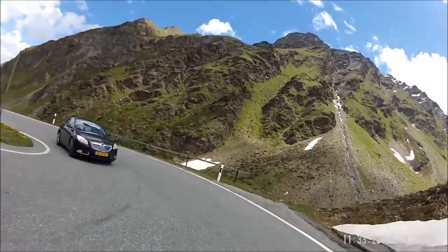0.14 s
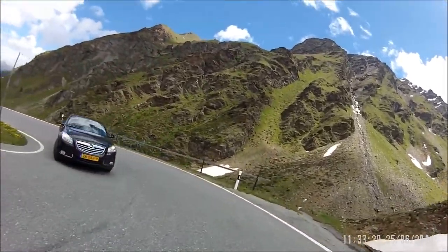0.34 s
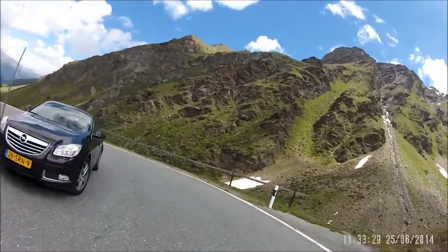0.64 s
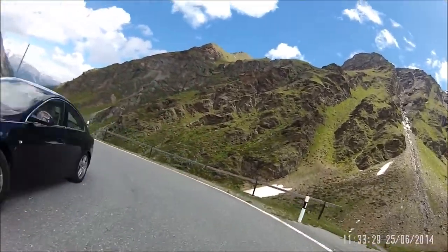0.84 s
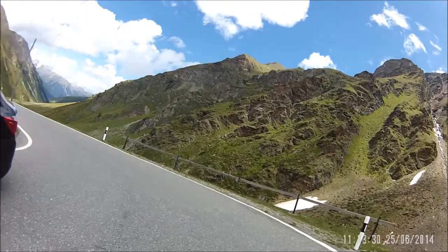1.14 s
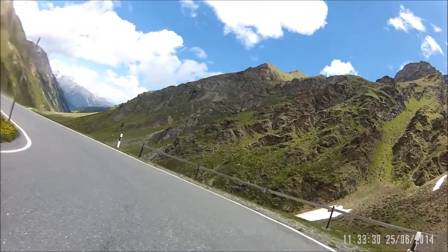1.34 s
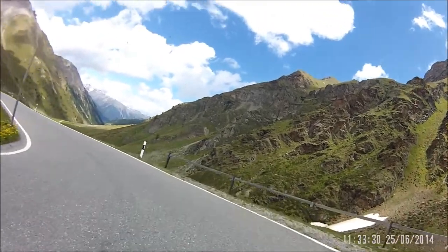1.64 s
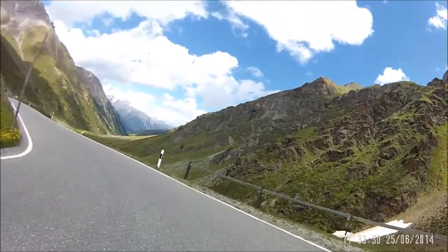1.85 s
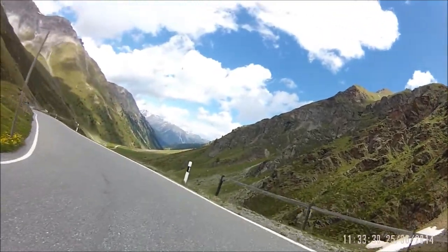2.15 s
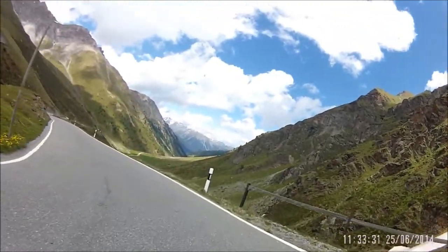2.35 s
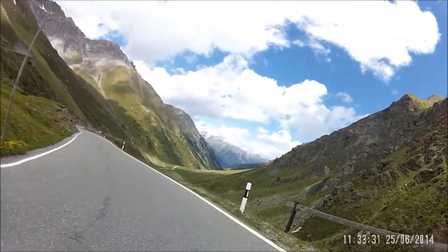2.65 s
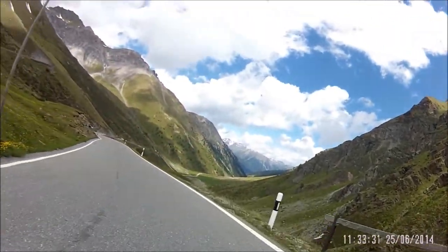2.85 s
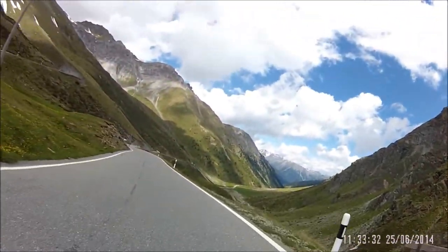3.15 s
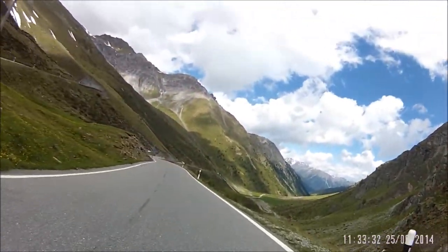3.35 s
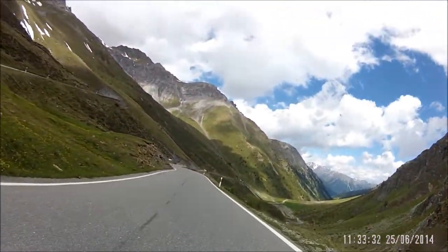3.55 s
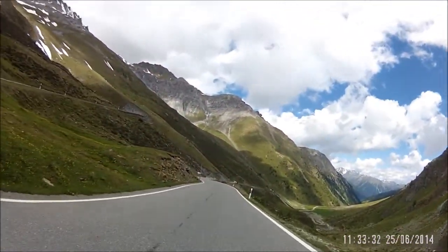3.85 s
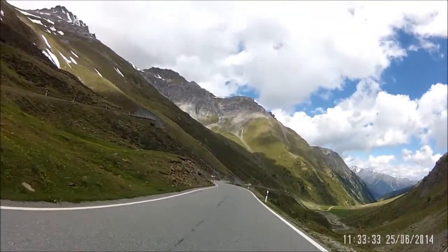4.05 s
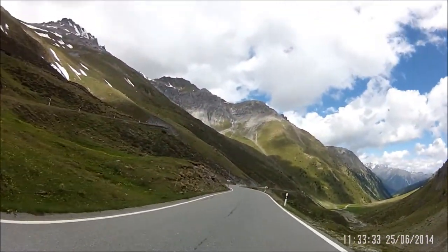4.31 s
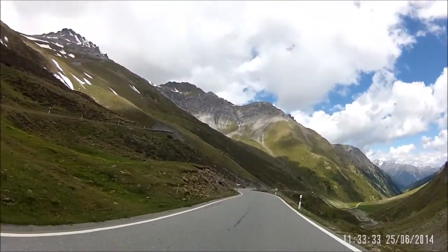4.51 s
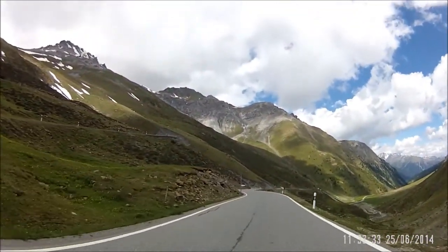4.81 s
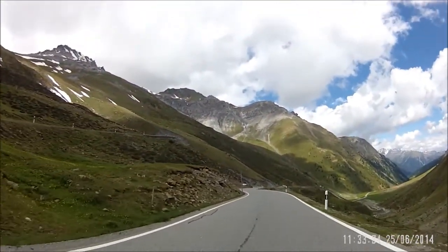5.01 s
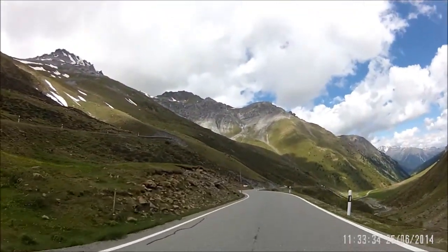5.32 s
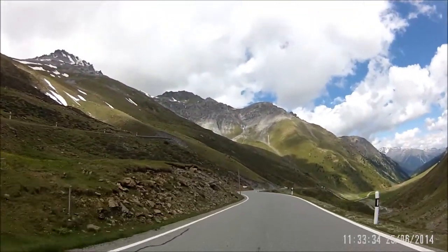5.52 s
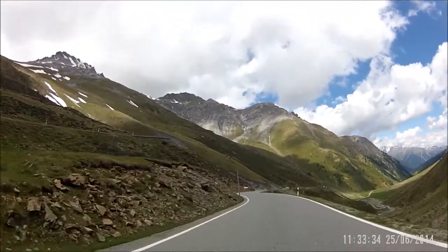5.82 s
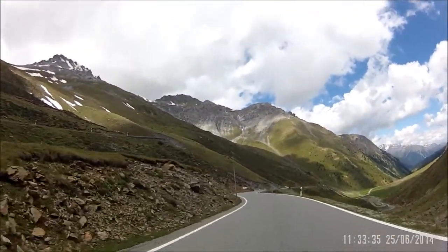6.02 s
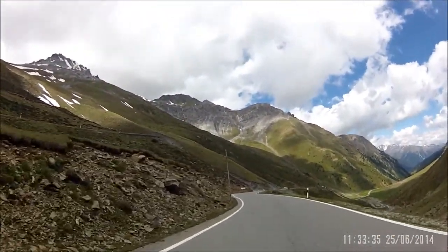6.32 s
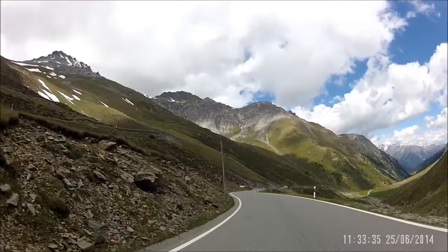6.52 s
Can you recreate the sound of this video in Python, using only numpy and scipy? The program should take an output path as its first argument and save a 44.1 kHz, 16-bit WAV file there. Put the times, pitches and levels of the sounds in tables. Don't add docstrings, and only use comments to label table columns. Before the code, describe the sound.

A twin-cylinder motorcycle idles lumpily round a hairpin as a car hisses past, then the throttle opens and it climbs into a loud drone.

```python
import sys
import numpy as np
from scipy import signal
from scipy.fft import rfft, irfft, next_fast_len
from scipy.io import wavfile
from scipy.ndimage import uniform_filter1d, map_coordinates

SR = 44100
rng = np.random.default_rng(int(sys.argv[2]) if len(sys.argv) > 2 else 0)


def volts(x):
    e = np.asarray(x, float) / 20
    return 10 ** e


def materialize(psi):
    bounded = np.clip(np.atleast_2d(psi).T, -1, 1)
    quanta = np.round(bounded * 32767).astype(np.int16)
    wavfile.write(sys.argv[1], SR, quanta)


N = 294130
TIME = np.arange(N) / SR

# start_s, speed_cycles_per_s
ENGINE_SPEED = [(0, 11.72), (.479, 12.36), (1.036, 12.13), (1.473, 11.41), (1.743, 11.86), (2.094, 11.4),
                (2.751, 11.33), (3.4, 11.92), (3.712, 16.7), (4.191, 16.89), (4.371, 18.78), (4.659, 18.22),
                (4.75, 19.18), (5.44, 23.2), (5.9, 25.84), (6.43, 28.85), (6.67, 30.2)]
# start_s, load_0_to_1
ENGINE_LOAD = [(3.28, 0.13), (3.68, 0.39), (4.16, 0.55), (4.5, 0.79), (5.6, 0.88), (6.67, 1)]

# pitch_hz, width_hz, level_db
FRONT_PIPE = [(45, 166, -7.5), (123.5, 52, 2), (168.5, 15.7, 9.5), (242, 140, -16)]
REAR_PIPE = [(76, 12, 2), (101, 48.3, 1), (145.8, 25.2, 4.5), (209, 74, -15)]
# order_per_cycle, level_db (under the pops)
FRAME_SHAKE = [(3, -13), (5, -13), (8, -8.5), (12, -14), (14, -9.5)]
# pitch_hz, level_db
SILENCER_RUMBLE = [(32, -40.5), (55, -15), (64, -23.5), (73, -10.5), (86, 0), (151, -5), (215, -10.5),
                   (320, -20.5), (420, -52), (700, -120)]

# place_in_cycle, level_db
VALVE_TAPS = [(0.048, -8.5), (.36, -7), (0.478, 1.5), (.74, -7.5), (0.86, 4.5)]
# pitch_hz, level_db
CASE_IDLE = [(530, -23), (900, -19), (999, -34.5), (1120, -11), (1220, -16.5), (1370, -7.5), (1450, -10),
             (1500, -3.5), (1810, -9), (2060, -7), (2190, -6), (2400, -4.5), (3170, -17.5), (3600, -22.5),
             (4680, -58), (7920, -120)]
CASE_PULLING = [(530, -33), (900, -16), (1030, -8.5), (1110, -0.5), (1210, -6.5), (1410, 0), (1560, -3.5),
                (1710, -1.5), (1860, -5), (2100, -1), (3080, -7), (3320, -29.5), (3600, -15.5),
                (4680, -45.5), (7920, -120)]
# pitch_hz, level_db
TYRE_HISS = [(1880, -34), (3200, -1), (3480, -7), (4030, -6), (5080, -11), (6280, -27.5), (8160, -58.5),
             (13800, -120)]
GAS_ROAR = [(150, -29.5), (260, -1.5), (301, -8), (375, -3.5), (415, -10.5), (497, -6), (633, -10),
            (1000, -10.5), (1300, -44), (2200, -120)]
# pitch_hz, level_db
RAP_COLOUR = [(600, -45), (1200, 6.5), (3000, 0.0), (4800, -16.5), (6000, -47.5), (8000, -92)]

# pitch_hz, level_db
WIND_COLOUR = [(8.2, -30.5), (14, -9.5), (38, -8.5), (47, -8.5), (55, -11.5), (72, -40.5), (120, -120)]
# centre_s, extra_db, half_length_s
GUSTS = [
    (0.527, -2, .15),
    (1.96, -3, 0.21),
    (4.413, -2, .2),
    (6.122, 3, 0.21),
]
# pitch_hz, level_db
CAR_TYRES = [(500, -17), (1200, -9), (2200, 1), (3500, -4), (5000, -19.5), (6300, -26), (9000, -80)]

# start_s, peak_db, pitch_hz
JOLTS = [(3.315, -37, 525), (3.39, -37, 372), (3.489, -35, 328), (3.995, -32.5, 567), (4.085, -32, 576),
         (4.1, -39, 360), (4.81, -35.5, 1080), (4.865, -34, 490), (5.29, -38, 556), (5.635, -34, 1150),
         (5.645, -27, 2200), (5.776, -28, 556), (6.306, -24.5, 385), (6.63, -26, 560)]
# order_per_cycle, level_db (at full load)
GEAR_MESH = [(19, -39.5), (20, -43), (32, -40), (33, -42.5)]
# pitch_hz, width_hz, level_db
TANK_PANELS = [(490, 75, 0), (945, 70, 0)]

# start_s, firing_db, gulp_db
THROTTLE = [(3.549, -23, -32), (3.631, -6, -3), (3.7, -0.3, 4), (4.2, 0.5, 7), (4.4, 1, 9), (4.75, 4.5, 4),
            (5.2, 5, 5.5), (5.88, 7, 8), (5.98, 6, 8), (6.2, 6.5, 8), (6.27, 8.7, 11.5), (6.67, 7, 8.5)]
FIRINGS = (.616, .021)
GULPS = (.226, .832)
# pitch_hz, width_hz, level_db
HOT_PIPES = [
    [(76.7, 6, 21.9), (110.8, 15.8, 23.9), (150.4, 30.5, 30.3), (137.5, 40.4, 17.1)],
    [(78.9, 6, 27), (149.1, 6.5, 20.2), (172.1, 56.7, 25.2), (228, 40, 13)],
]
# pitch_hz, width_hz, level_db
AIRBOX = [
    [(83, 25.4, 22.9), (162.3, 9.3, 19.5), (240, 25.6, 2), (101.4, 8.1, 20.7)],
    [(97.1, 9.1, 26.3), (146, 34.8, 30.2), (158.4, 32.3, 28.4), (181.9, 24, 17.5)],
]
PIPE_SIGNS = [(1, 1, -1, 1), (-1, -1, 1, -1)]
AIRBOX_SIGNS = [(-1, 1, -1, 1), (-1, -1, 1, 1)]

# start_s, peak_db, pitch_hz
GRIT = [
    (3.713, -29, 2570),
    (4.0711, -43, 2500),
    (4.573, -45, 2533),
    (4.63, -45, 2500),
    (5.194, -32, 3070),
    (5.946, -40, 2530),
    (6.2874, -46, 2590),
]
# pitch_hz, level_db
PREAMP_HISS = [(5000, -32.5), (6500, -3), (10000, -5), (15200, -10), (16000, -93)]


def unit(x):
    return x / np.sqrt(np.mean(x ** 2) + 1e-20)


def curves(rows):
    s, *columns = np.transpose(rows)
    return [np.interp(TIME, s, column) for column in columns]


def by_load(idle_db, gain_db):
    return idle_db + gain_db * curves(ENGINE_LOAD)[0]


def bell(centre_s, half_s):
    return np.exp(-((TIME - centre_s) / half_s) ** 2)


def wobble(rate):
    return map_coordinates(rng.standard_normal(int(N * rate / SR) + 4), [TIME * rate])


def filtered(x, response):
    m = next_fast_len(N + SR // 2)
    return irfft(rfft(x, m) * response(np.fft.rfftfreq(m, 1 / SR)), m)[:N]


def noise(spectrum):
    f, db = np.transpose(spectrum)
    white = rng.standard_normal(N)
    return unit(filtered(white, lambda hz: volts(np.interp(np.log(hz + 1), np.log(f), db))))


def patchy(x, depth_db):
    z = signal.stft(x, nperseg=512)[2]
    field = uniform_filter1d(rng.standard_normal(z.shape), size=3, axis=0)
    field = uniform_filter1d(field, size=8, axis=1)
    return unit(signal.istft(z * volts(depth_db * unit(field)), nperseg=512)[1][:N])


def ringing(x, modes, signs):
    def response(f):
        total = 0
        for sign, (hz, width, db) in zip(signs, modes):
            damping = 1j * f * width
            total = total + sign * volts(db) * damping / (hz * hz - f * f + damping)
        return total
    return filtered(x, response)


def rounded(x):
    return filtered(x, lambda f: 1 / np.sqrt(1 + (f / 255) ** 10))


def crank():
    return np.cumsum(curves(ENGINE_SPEED)[0]) / SR


def beats(place, jitter, scatter_db):
    turns = crank()
    luck = rng.standard_normal((int(turns[-1]), 2))
    places = np.arange(len(luck)) + place + jitter * luck[:, 0]
    at = np.interp(places, turns, np.arange(N))
    return np.bincount(at.astype(int), volts(scatter_db * luck[:, 1]), N)


def exhaust():
    front = ringing(beats(.974, jitter=.004, scatter_db=2), FRONT_PIPE, [1, -1, -1, 1])
    rear = ringing(beats(.589, jitter=.004, scatter_db=2), REAR_PIPE, [1, -1, 1, -1])
    pops = unit(rounded(volts(-6.5) * front + rear))
    shake = sum(volts(db) * np.cos(2 * np.pi * (order * crank() + .05)) for order, db in FRAME_SHAKE)
    idle = (pops + shake) * np.interp(TIME, [3.55, 3.7], [1, 0])
    return volts(by_load(-31.3, 5) - 2) * (idle + volts(-9) * noise(SILENCER_RUMBLE))


def mechanics():
    taps = sum(volts(db) * beats(place, jitter=0.01, scatter_db=2) for place, db in VALVE_TAPS)
    t = TIME[:SR // 20]
    flare = signal.fftconvolve(taps, np.exp(-t / 0.0056) - np.exp(-t / 0.00037))[:N]
    pulling = np.interp(TIME, [3.5, 3.85], [0, 1])
    case = np.sqrt(1 - pulling) * patchy(noise(CASE_IDLE), depth_db=1.5)
    case = case + np.sqrt(pulling) * patchy(noise(CASE_PULLING), depth_db=1.0)
    clatter = volts(by_load(-42, 11.75) - 1.5) * (0.83 + 0.48 * flare) * case
    hiss = volts(by_load(-56, 15.1) - 0.97) * (0.63 + 0.54 * flare) * noise(TYRE_HISS)
    clutch_db = 2.5 * bell(3.42, 0.23)
    roar_db = by_load(-47, 13.2) + clutch_db - 1.2 + 1.3 * wobble(30)
    roar = volts(roar_db) * (0.81 + 0.48 * flare) * noise(GAS_ROAR)
    return clatter + hiss + roar


def whistle():
    speed = curves(ENGINE_SPEED)[0]
    shut_hz = np.minimum(1548 + 75 * (speed - 11.8), 1620)
    pull_hz = 1390 + 36 * (speed - 18.5)
    hz = np.where(TIME < 3.6, shut_hz, pull_hz)
    level_db = np.interp(TIME, [3.38, 3.6, 4.5, 5.15], [-48, -60, -60, -39.5])
    level_db = level_db + np.interp(TIME, [5.45, 5.7], [0, -6.5])
    warble_hz = 55 * np.sin(2 * np.pi * crank()) + 10 * wobble(12)
    turn = 2 * np.pi * np.cumsum(hz + warble_hz) / SR
    note = (4 + wobble(70)) * np.cos(turn) + wobble(70) * np.sin(turn)
    octave = wobble(120) * np.cos(2 * turn) + wobble(120) * np.sin(2 * turn)
    upper = (1 + wobble(90)) * np.cos(1.56 * turn) + wobble(90) * np.sin(1.7 * turn)
    return volts(level_db) * unit(note + volts(-1.0) * octave + volts(-7.0) * upper)


def knock():
    front = beats(.47, jitter=.004, scatter_db=2)
    rear = beats(.855, jitter=.004, scatter_db=2)
    raps = front + volts(-4) * rear
    t = TIME[:SR // 50]
    burst = signal.fftconvolve(raps, np.exp(-t / .003) - np.exp(-t / .0007))[:N]
    boom = ringing(raps, [(505, 50, 30), (340, 42, 21)], [1, -1])
    labour_db = 5 * bell(4.5, .3)
    level_db = by_load(-42.5, 15.8)
    return volts(level_db) * boom + volts(level_db + labour_db) * burst * noise(RAP_COLOUR)


def wind():
    gusts_db = sum(db * bell(s, half_s) for s, db, half_s in GUSTS)
    return volts(by_load(-44.5, 7.4) + gusts_db + 0.72 * wobble(9.1)) * noise(WIND_COLOUR)


def car():
    nearest_m, speed_m_per_s, hidden_s = 3.2, 6.3, 0.14
    since_s = TIME - 1.17
    nearness = nearest_m / np.hypot(nearest_m, speed_m_per_s * since_s)
    shadow = np.exp(-np.clip(since_s, 0, None) / hidden_s)
    return volts(-45.5) * nearness * shadow * patchy(noise(CAR_TYRES), depth_db=2.0)


def jolts():
    rise_s, t60_s = 0.0035, 0.062
    out, t = np.zeros(N + SR), TIME[:SR // 8]
    for s, db, hz in JOLTS:
        envelope = volts(db + 3 - 60 * t / t60_s) * (1 - np.exp(-t / rise_s))
        out[round(s * SR):][:len(t)] += envelope * np.sin(2 * np.pi * hz * t)
    turns = crank()
    mesh = sum(volts(db + 2 * wobble(24)) * np.cos(2 * np.pi * order * turns) for order, db in GEAR_MESH)
    singing = ringing(curves(ENGINE_LOAD)[0] ** 3 * mesh, TANK_PANELS, [1, -1])
    return out[:N] + ringing(singing, TANK_PANELS, [1, -1])


def pulse_drone(level_db, places, bodies, polarities):
    drone = 0
    for place, modes, signs in zip(places, bodies, polarities):
        pulses = beats(place, jitter=.0015, scatter_db=.7)
        pulses = volts(level_db) * (TIME > THROTTLE[0][0]) * pulses
        drone = drone + ringing(pulses, modes, signs)
    return drone


def intake():
    firing_db, gulp_db = curves(THROTTLE)
    pipes = pulse_drone(firing_db, FIRINGS, HOT_PIPES, PIPE_SIGNS)
    airbox = pulse_drone(gulp_db, GULPS, AIRBOX, AIRBOX_SIGNS)
    return volts(0.67) * rounded(pipes + airbox)


def grit():
    out, t = np.zeros(N), TIME[:SR // 50]
    for s, db, hz in GRIT:
        ring = 2.5 * np.sin(2 * np.pi * hz * t) + .35 * np.sin(2 * np.pi * 5700 * t)
        crack = .6 * rng.standard_normal(len(t))
        out[round(s * SR):][:len(t)] += volts(db + 1 - 60 * t / .012) * (ring + crack)
    return filtered(out, lambda f: (f / 2500) ** 2 / (1 + (f / 2500) ** 2))


def scene():
    engine = exhaust() + mechanics() + whistle() + knock() + intake()
    surroundings = wind() + car() + jolts() + grit()
    return (engine + surroundings)[None]


def roll_off(x):
    return signal.sosfilt(signal.butter(12, 15250, fs=SR, output="sos"), x)


def record(dry):
    muffled = filtered(dry[0], lambda f: 1 / np.sqrt(1 + (f / 6300) ** 16))
    hiss = volts(-79) * noise(PREAMP_HISS)
    whine_db = -86 - 1 + 2 * wobble(30)
    whine = volts(whine_db) * np.sin(2 * np.pi * 10520 * TIME)
    return roll_off((muffled + hiss + whine)[None])


dry = scene()
out = record(dry)
materialize(out)
```